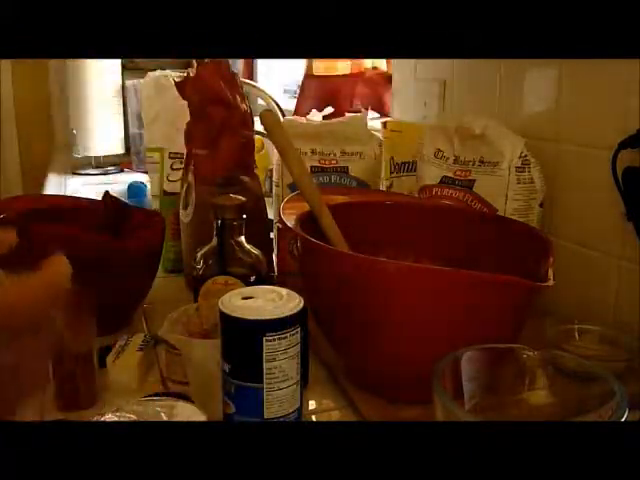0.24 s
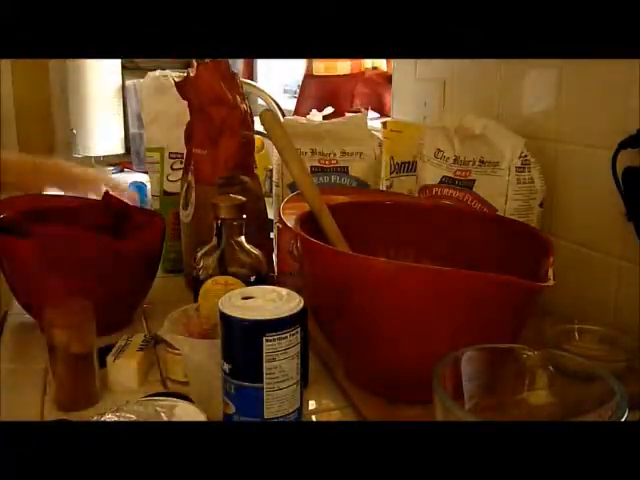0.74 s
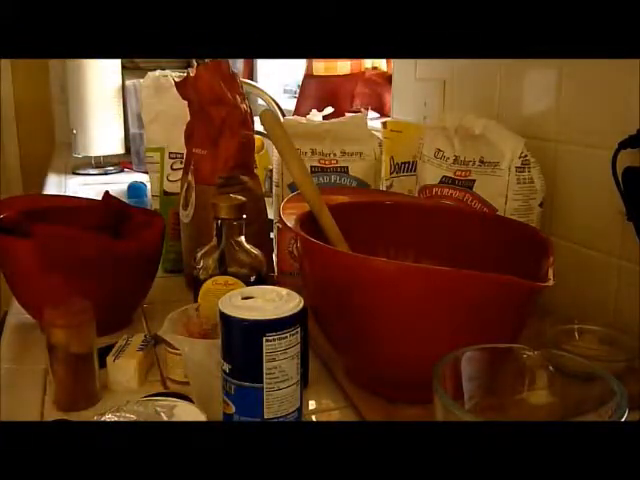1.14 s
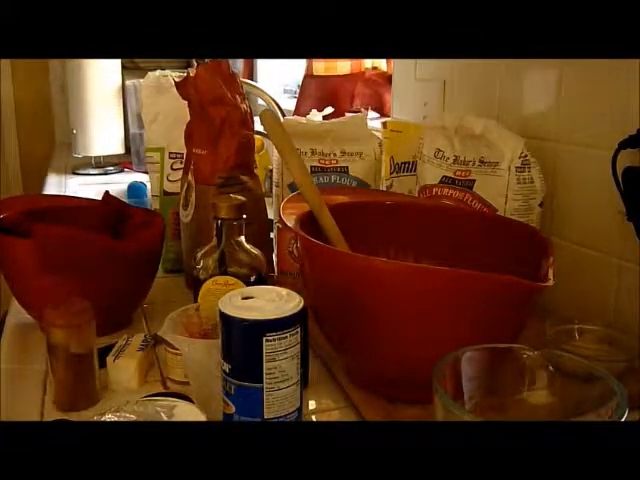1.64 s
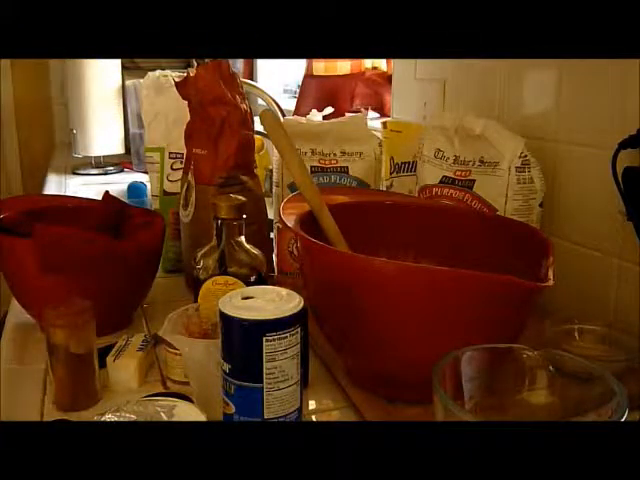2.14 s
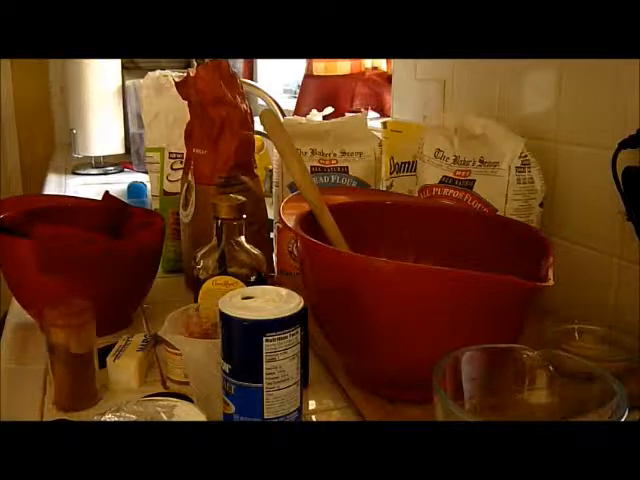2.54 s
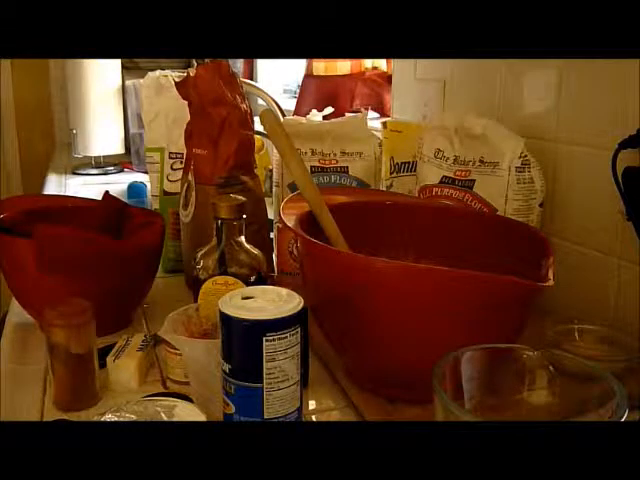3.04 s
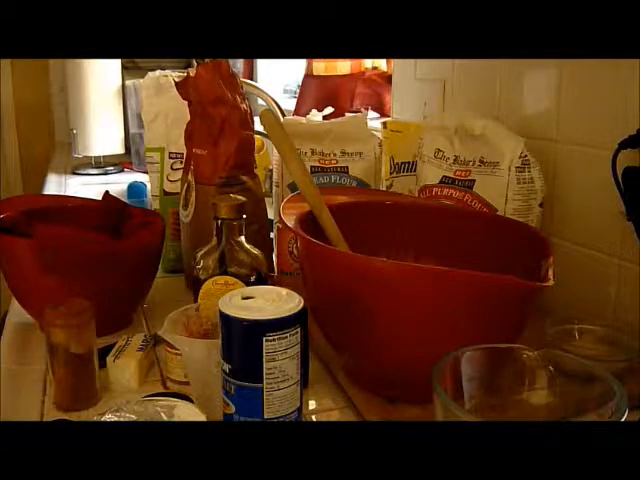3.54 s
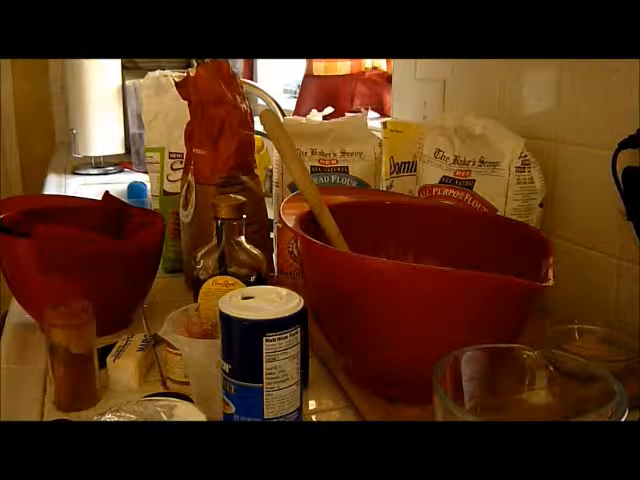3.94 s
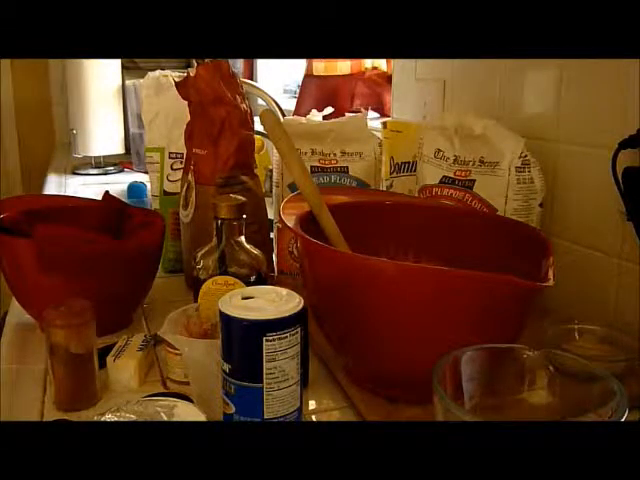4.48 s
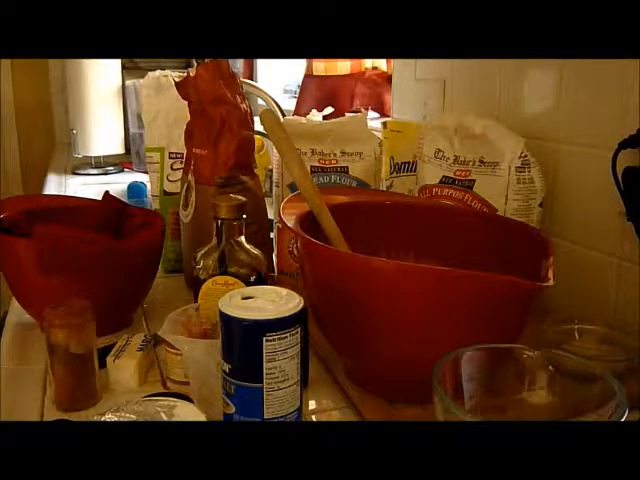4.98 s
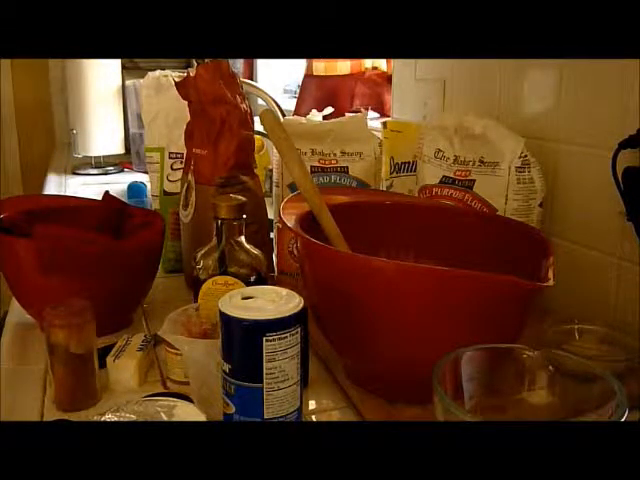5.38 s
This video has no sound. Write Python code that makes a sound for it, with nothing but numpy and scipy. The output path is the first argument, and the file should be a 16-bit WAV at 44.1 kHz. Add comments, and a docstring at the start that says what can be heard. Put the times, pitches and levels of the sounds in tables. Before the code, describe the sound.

A hand faintly brushes a handle, then two crisp metallic clacks release a microwave door. It groans quietly, bumps, and rattles in a quick burst. Glass and bowl rub, ring and tick as the bowl comes out. Near the end, plastic hooks judder and the door bangs shut, booming through the steel cabinet. Lively tiled kitchen, slightly dull mono camera sound, soft rumble and hiss underneath.

```python
"""A microwave oven door in a small tiled kitchen, heard from across the counter.
Its latch snaps open, the door bumps and clatters, then its hooks ride up their ramps and it slams shut.
In between, a bowl is nudged and dragged off the glass tray. Quiet room noise lies underneath.
Knocks are cracks plus grainy noise, ringing parts are fading sine waves,
and rubbing is a stream of uneven pulses sent through resonances."""
import sys
import numpy as np
from scipy import signal
from scipy.fft import rfft, irfft
from scipy.io import wavfile
from scipy.ndimage import uniform_filter1d

SR = 44100
rng = np.random.default_rng(int(sys.argv[2]) if len(sys.argv) > 2 else 0)


def wav_record(signal):
    """Record a signal, one row per channel, as 16-bit PCM in the file named by sys.argv[1]."""
    frames = np.transpose(np.atleast_2d(signal))
    bounded = np.clip(frames, -1, 1)
    # unit amplitude maps onto the largest positive 16-bit level
    quanta = np.round(bounded * 32767).astype(np.int16)
    wavfile.write(sys.argv[1], SR, quanta)


N = 247489  # length of the scene in samples


# The door hits the cabinet, near edge first, then the whole frame: [t/s, level/dB]
SLAM_HITS = [(5.0205, -21), (5.0255, -15)]
# First contact as the door rebounds and shudders: [t/s, level/dB]
SHUDDER = (5.052, -22)
# Colour of the slam: [f/Hz, relative level per Hz/dB]
SLAM_COLOUR = [(35, -28), (58, -17), (105, 1), (200, -3.5), (330, -2), (520, -1), (700, -1.5), (1000, -7.5),
               (1600, -12), (2300, -15), (3200, -21), (5000, -20), (7200, -29.5), (8200, -46)]
# Ringing of the steel cabinet: [f/Hz, relative level/dB, t60/s]
CABINET_MODES = [(103.3, -10.5, 0.41), (184.3, -8.5, 0.55), (224.4, -6, .25), (266.6, -5, 0.24),
                 (307.4, -6.5, 0.34), (333.4, -8.5, 0.3), (401.4, -2.5, 0.38), (443.5, -17, 0.68),
                 (519, -10.5, 0.47), (560, -20, .35), (643, -8, 0.53), (878, -12, 0.45), (895, -15, 0.59),
                 (1065, -16, 0.55), (1297, -23, 0.44), (1695, -17, 0.45)]
# The slam rocks the whole oven: [f/Hz, level/dB, t60/s]
SLAM_THUMP = [(58, -31.5, 0.13), (92.7, -18, 0.082), (243, -17.5, 0.083), (312, -10.5, 0.051),
              (614, -24, 0.038)]


def door_slam():
    """The door strikes the frame and shudders; the blows rock the oven and make its cabinet boom."""
    shudder = rebounds(*SHUDDER, gap_s=0.0225, step_db=-2.5, count=5)
    impacts = SLAM_HITS + shudder
    knock = blows(impacts, SLAM_COLOUR, crack_db=-16.0, rattle_t60=0.073, room_db=-4.5, grain_db=4)
    boom = ringing(impacts, CABINET_MODES, level_db=-5.5)
    return knock + thump(5.0212, SLAM_THUMP) + boom


# The two sprung hooks snap free: [t/s, level/dB, loss per rebound/dB]
LATCH_SNAPS = [(0.6861, -19, 2.26), (0.7685, -19.5, 4.2)]
# Each hook slips just before it snaps, then chatters at the pace of its spring
SLIP_LEAD_S, SLIP_DB, SPRING_GAP_S = 0.0066, -3.5, 0.0087  # slip level is relative to the snap


def latch_contacts():
    """Each hook slips, snaps and chatters, losing the same number of decibels per rebound."""
    hits = []
    for s, db, loss_db in LATCH_SNAPS:
        hits.append((s - SLIP_LEAD_S, db + SLIP_DB))
        hits += rebounds(s, db, SPRING_GAP_S, -loss_db, count=4)
    return hits


# Colour of the opening latch: [f/Hz, relative level per Hz/dB]
LATCH_COLOUR = [(60, -37), (110, -30), (170, -11.5), (260, -17.5), (480, -15.5), (1200, -10.5), (1950, -5),
                (2250, -7.5), (2950, 4), (3600, -5), (4450, -4), (5100, -14), (7300, -17), (8200, -39)]
# Ringing of the latch springs: [f/Hz, relative level/dB, t60/s]
SPRING_MODES = [(174.6, -15.5, 0.38), (209.5, -16.5, 0.32), (322, -13.5, 0.21), (630, -19.5, 0.87),
                (1760, -12, 0.61), (1915, -8.5, 0.51), (2630, -2, .35), (2650, -13, 0.31), (3055, -4, 0.31),
                (3150, -11, 0.21), (3175, -1, 0.28), (3370, -17, 0.22), (3640, -10, 0.31),
                (3920, -10, 0.48), (4290, -11.5, 0.32), (4350, -23, 0.38), (4470, -35, .5)]
# The door jumps free of its frame: [f/Hz, level/dB, t60/s]
RELEASE_THUMP = [(151, -32.5, 0.11), (180, -29.5, 0.1)]


def latch_release():
    """The sprung hooks let go: sharp snaps, ringing springs and a low thump from the freed door."""
    snaps = latch_contacts()
    clicks = blows(snaps, LATCH_COLOUR, crack_db=-9, rattle_t60=0.078, room_db=-3.5, grain_db=3.0)
    springs = ringing(snaps, SPRING_MODES, level_db=-10.5)
    return clicks + springs + thump(0.686, RELEASE_THUMP)


# The two hooks snap home: [t/s, level/dB]
CATCH_HITS = [(5.0203, -20.5), (5.0245, -22)]
# Colour of the closing catch: [f/Hz, relative level per Hz/dB]
CATCH_COLOUR = [(300, 17), (1500, 10), (2800, 13.5), (5000, 6.5), (7500, 0), (8200, -36)]


def latch_catch():
    """Two hooks strike home with a sharp crack and a short, grainy rattle."""
    return blows(CATCH_HITS, CATCH_COLOUR, crack_db=-6.5, rattle_t60=0.083, room_db=-8, grain_db=7.5)


# First contact of the plastic hooks with their ramps: [t/s, level/dB]
HOOK_CONTACT = (4.9695, -28)
# Colour of the hooks: [f/Hz, relative level per Hz/dB]
HOOK_COLOUR = [(25, -38), (60, -7), (170, -6), (260, -11), (550, 4.5), (900, -1), (1700, -0.5), (2400, -6),
               (3500, -7), (7200, -16.5), (8200, -43)]


def hook_judder():
    """Plastic hooks judder up their ramps in a quick run of knocks."""
    judder = rebounds(*HOOK_CONTACT, gap_s=0.0098, step_db=-0.04, count=5)
    return blows(judder, HOOK_COLOUR, crack_db=-21, rattle_t60=0.073, room_db=3.5, grain_db=2.0)


# The moment the door presses hardest against its stop: [t/s, level/dB]
CLATTER_PEAK = (2.4865, -21)
# Time between contacts, then time for the bell to rise and fall by about 9 dB
CLATTER_GAP_S, CLATTER_RISE_S, CLATTER_FALL_S = 0.0135, 0.039, 0.025


def clatter_contacts():
    """The loose door rattles harder as it presses into its stop, then eases off along a bell curve."""
    peak_s, peak_db = CLATTER_PEAK
    start_s = peak_s - 5 * CLATTER_GAP_S
    contacts = rebounds(start_s, peak_db, CLATTER_GAP_S, 0, count=10)
    hits = []
    for s, db in contacts:
        width_s = CLATTER_RISE_S if s < peak_s else CLATTER_FALL_S
        drop_db = 20 / np.log(10) * ((s - peak_s) / width_s) ** 2
        hits.append((s, db - drop_db))
    return hits


# Colour of the clatter: [f/Hz, relative level per Hz/dB]
CLATTER_COLOUR = [(50, -27), (75, -7.5), (110, -4), (165, -0.5), (220, -9), (550, -4), (900, -4.5),
                  (1450, -3), (2100, -11), (2700, -11), (3300, -14.5), (7300, -21), (8200, -44)]
# Ringing of the door: [f/Hz, relative level/dB, t60/s]
DOOR_MODES = [(101, -24, 0.28), (111, -19, 0.32), (535, 2, 0.21), (676, -5, 0.45), (1180, -8, 0.35),
              (1412, -3.5, 0.53), (1460, -1.5, 0.3), (1560, -15, .35), (1760, -8.5, 0.49),
              (2240, -9.5, 0.34), (2830, -13.5, .4)]


def door_clatter():
    """The open door knocks repeatedly against its stop, and each knock makes the door ring."""
    contacts = clatter_contacts()
    rattle = blows(contacts, CLATTER_COLOUR, crack_db=-12.5, rattle_t60=0.11, room_db=-3.0, grain_db=4.0)
    return rattle + ringing(contacts, DOOR_MODES, level_db=-9)


# Soft bumps of the door and cabinet: [t/s, level/dB]
BUMP_HITS = [(2.04, -47), (2.088, -39), (2.103, -41), (2.388, -48.5), (2.775, -46), (2.85, -44)]
# Colour of the bumps: [f/Hz, relative level per Hz/dB]
BUMP_COLOUR = [(45, -10), (100, 1), (240, -0.5), (380, 1), (700, 4), (1100, -11.5), (2500, -16.5),
               (7500, -31)]
# Ringing after the firmest bump: [f/Hz, relative level/dB, t60/s]
BUMP_MODES = [(109, -7, 0.27), (395, -8, 0.23), (563, -5.5, 0.3), (667, -3.5, 0.27), (770, -12, 0.31),
              (4740, -21.5, .3)]


def door_bumps():
    """Soft blows give dull knocks; only the firmest one also rings."""
    firmest = max(BUMP_HITS, key=lambda bump: bump[1])
    bumps = blows(BUMP_HITS, BUMP_COLOUR, crack_db=-18.5, rattle_t60=0.099, room_db=-1.0, grain_db=2.0)
    return bumps + ringing([firmest], BUMP_MODES, level_db=3.0)


# The door panel groans under the hand: [start t/s, rise/s, fall/s, level/dB]
GROANS = [(2.02, 0.012, 0.03, -41), (2.364, 0.006, 0.06, -39)]
# Resonances of the panel: [f/Hz, width/Hz, relative level/dB]
PANEL_MODES = [(98, 24, 2), (185, 23, -4), (327, 44, 3.5), (380, 36, 0.5), (533, 67, -14)]


def panel_groan():
    """The pressed panel sticks and slips slowly, which gives a low groan."""
    return rubbing(GROANS, PANEL_MODES, slip_hz=104.4, jitter=0.13, room_db=-10)


# The door spring rings on after the latch opens: [start t/s, rise/s, fall/s, level/dB]
SPRING_SONGS = [(.8, 0.088, 0.13, -44), (1.0, 0.086, 0.42, -58.5)]
# Resonance of the door spring: [f/Hz, width/Hz, relative level/dB]
SPRING_SONG_MODES = [(657, 17, 0)]


def spring_song():
    """The door spring rings on: nearly regular pulses, close to its pitch, drive one narrow resonance."""
    return rubbing(SPRING_SONGS, SPRING_SONG_MODES, slip_hz=652, jitter=0.044, room_db=-8)


# A hand brushes the handle: [start t/s, rise/s, fall/s, level/dB]
TOUCHES = [(.27, 0.024, .02, -54.5), (.32, 0.0097, 0.027, -46.5)]
# Resonances of the handle: [f/Hz, width/Hz, relative level/dB]
HANDLE_MODES = [(1580, 180, -1.5), (3250, 590, -8.5)]


def handle_touch():
    """The brushing hand excites two broad resonances of the handle."""
    return rubbing(TOUCHES, HANDLE_MODES, slip_hz=808, jitter=0.33, room_db=-2)


# The bowl drags over the tray in one stroke: [start t/s, rise/s, fall/s, level/dB]
DRAGS = [(3.7, 0.04, 0.11, -30.5)]
# Resonances of the rubbed bowl: [f/Hz, width/Hz, relative level/dB]
BOWL_MODES = [(335, 57, -8), (405, 15, -2), (472, 35, -19), (523, 17, -6), (662, 36, -5), (728, 40, -8),
              (1110, 48, 0), (1630, 23, -16), (1862, 40, -8), (2280, 40, -23), (2730, 50, -19),
              (3860, 87, -24.5)]


def bowl_drag():
    """The bowl sticks and slips across the tray, ringing its own resonances."""
    return rubbing(DRAGS, BOWL_MODES, slip_hz=389.7, jitter=0.23, room_db=-9)


# First contact as the bowl rocks while lifting clear: [t/s, level/dB]
LIFT = (3.71, -39.5)
# Ringing of the lifted bowl: [f/Hz, relative level/dB, t60/s]
LIFT_MODES = [(780, 0.5, 0.26), (1088, 0.5, 0.46), (1895, -5, 0.51), (2780, -18.5, 0.29), (3890, -23, 0.47),
              (5180, -28, 0.32)]


def bowl_lift():
    """Three small contacts make the rocking bowl ring."""
    rocks = rebounds(*LIFT, gap_s=0.025, step_db=-0.1, count=3)
    return ringing(rocks, LIFT_MODES, level_db=0.5)


# First light plastic tick as the bowl clears the door: [t/s, level/dB]
TICK = (3.914, -38.5)
# Colour of the tick: [f/Hz, relative level per Hz/dB]
TICK_COLOUR = [(200, -22), (600, -3), (1100, 2), (2400, -8.5), (4200, -5.5), (7200, -12), (8200, -32)]


def bowl_tick():
    """The bowl grazes the door in three light contacts."""
    grazes = rebounds(*TICK, gap_s=0.0074, step_db=-0.5, count=3)
    return blows(grazes, TICK_COLOUR, crack_db=-24, rattle_t60=0.27, room_db=-2.5, grain_db=0.5)


# The glass tray is nudged twice, then rubbed as the bowl starts to drag:
# [start t/s, rise/s, fall/s, level/dB]
TRAY_RUBS = [(3.305, 0.026, 0.043, -37.5), (3.495, 0.032, 0.022, -40), (3.62, 0.073, 0.021, -46)]
# Resonances of the rubbed tray: [f/Hz, width/Hz, relative level/dB]
TRAY_MODES = [(182, 8.8, 1.5), (404, 32, 7.5), (877, 14, -6), (1123, 57, 1), (1244, 44, -2), (1750, 18, -5),
              (2460, 50, -14), (2920, 26, -11.5), (3150, 30, -11.5)]


def tray_rubs():
    """Two nudges and the start of the drag: very uneven slips set the glass tray ringing."""
    return rubbing(TRAY_RUBS, TRAY_MODES, slip_hz=400.4, jitter=.6, room_db=-3.5)


# The rim of the bowl sings briefly: [start t/s, rise/s, fall/s, level/dB]
SQUEAK = [(3.31, 0.013, 0.023, -54)]
# Resonance of the rim: [f/Hz, width/Hz, relative level/dB]
RIM_MODES = [(5680, 30, 0)]


def rim_squeak():
    """A short rub excites one high, narrow resonance of the rim."""
    return rubbing(SQUEAK, RIM_MODES, slip_hz=885, jitter=0.43, room_db=-7)


# Colour of the steady room noise: [f/Hz, relative level per Hz/dB]
ROOM_COLOUR = [(25, -16.5), (50, -12.5), (100, -7), (210, -1.5), (320, 0), (450, -5), (650, -6),
               (1000, -9.5), (1600, -13), (2400, -16), (4000, -19), (7200, -21.5), (8200, -37.5)]
ROOM_DB = -51
# Faint appliance hum: [f/Hz, level/dB]
HUM = [(120, -73), (220, -64), (307, -63.5), (517, -69.5)]


def room_noise():
    """Filtered noise makes soft rumble and hiss; steady sine waves add a trace of hum."""
    t = np.arange(N) / SR
    hum = np.zeros(N)
    for hz, db in HUM:
        hum += from_db(db) * np.sqrt(2) * np.sin(2 * np.pi * (hz * t + rng.random()))
    # the first second is dropped so that the filter has settled
    noise = coloured(rng.standard_normal(N + SR), ROOM_COLOUR)[SR:]
    return from_db(ROOM_DB) * noise + hum


# How long the kitchen reverberates at each pitch: [f/Hz, t60/s]
KITCHEN_T60 = [(100, 0.41), (400, 0.67), (1500, 0.66), (3500, 0.56), (7000, 0.5)]


def kitchen_tail(build_t60=0.0168):
    """One second of diffuse echoes: noise that builds up briefly, then fades at a rate set by its pitch."""
    t, hz = np.arange(SR) / SR, np.fft.rfftfreq(SR, 1 / SR)
    white = rfft(rng.standard_normal(SR))
    centres, t60s = np.transpose(KITCHEN_T60)
    tail = np.zeros(SR)
    # overlapping bands that add up to the full spectrum
    for band, t60 in zip(np.eye(len(centres)), t60s):
        share = at_hz(np.c_[centres, band], hz)
        tail += irfft(white * share, SR) * dying(t, t60)
    return unit(tail * (1 - dying(t, build_t60)))


def blows(hits, colour, crack_db, rattle_t60, room_db, grain_db):
    """Each blow is a crack, a grainy rattle and the room; a hit's dB sets the rattle level over 10 ms."""
    out, t = np.zeros(N), np.arange(SR) / SR
    for s, db in hits:
        # the loudness of the noise jumps every 20 samples
        steps = np.repeat(rng.standard_normal(SR), 20)[:SR].clip(-2, 2)
        grains = rng.standard_normal(SR) * from_db(grain_db * steps)
        blow = unit(grains * dying(t, rattle_t60)) + from_db(room_db) * kitchen_tail()
        blow[0] += from_db(crack_db)
        add(out, s, from_db(db) * np.sqrt(SR / 100) * blow)
    return coloured(out, colour)


def ringing(hits, modes, level_db):
    """Every blow feeds each mode its share of energy, which then dies away."""
    out, t = np.zeros(N), np.arange(SR) / SR
    start = min(s for s, db in hits)
    ring = np.zeros(SR)
    for hz, mode_db, t60 in modes:
        energy = np.zeros(SR)
        for s, db in hits:
            since = t - s + start
            height = from_db(db) * dying(np.maximum(since, 0), t60)
            energy += height ** 2 * (t >= s - start)
        # soften each onset over about 1 ms
        envelope = signal.lfilter([.02], [1, -.98], np.sqrt(energy))
        # reflections make the phase wander a little
        wander = np.cumsum(rng.standard_normal(SR)) * 0.027
        tone = np.sin(2 * np.pi * (hz * t + rng.random()) + wander)
        ring += from_db(mode_db) * envelope * tone
    add(out, start, from_db(level_db) * ring)
    return out


def rubbing(strokes, modes, slip_hz, jitter, room_db):
    """Stick and slip: uneven pulses set resonances ringing under each stroke."""
    t = np.arange(N) / SR
    force = np.zeros(N)
    for s, rise, fall, db in strokes:
        force += from_db(db) * np.interp(t, [s, s + rise, s + rise + fall], [0, 1, 0])
    # jitter is the spread of the logarithm of the gaps
    gaps = np.exp(jitter * rng.standard_normal(N // 20)) / slip_hz
    pulses = np.histogram(np.cumsum(gaps), N, (0, N / SR))[0]
    slips = pulses * (force + 1e-12)
    heard = slips + from_db(room_db) * signal.fftconvolve(slips, kitchen_tail())[:N]
    shares = unit(from_db(np.array(modes)[:, 2]))
    rings = []
    for hz, width, db in modes:
        narrow = resonance(heard, hz, width)
        # smooth contact: next to nothing sounds between the resonances
        rings.append(unit(resonance(narrow, hz, 8 * width)))
    return np.sqrt(np.sum(force ** 2)) * (shares @ np.array(rings))


def thump(s, modes):
    """Heavily damped low modes, all started by one push, with alternating signs."""
    out, t = np.zeros(N), np.arange(SR) / SR
    push = np.zeros(SR)
    for k, (hz, db, t60) in enumerate(modes):
        push += (-1) ** k * from_db(db) * np.sin(2 * np.pi * hz * t) * dying(t, t60)
    add(out, s, push)
    return out


UNEVEN = 0.08  # typical timing error of repeated contacts, as a share of their spacing


def rebounds(s, db, gap_s, step_db, count):
    """A contact repeats at a slightly uneven pace, changing by the same step each time: (t/s, level/dB)."""
    k = np.arange(count)
    late = UNEVEN * rng.standard_normal(count).clip(-2, 2) * (k > 0)
    return list(zip(s + gap_s * (k + late), db + step_db * k))


def coloured(x, spectrum, size=8192):
    """Causal (minimum-phase) filter that gives a noisy sound the stated spectrum and keeps its energy."""
    hz, bins_per_hz = np.fft.rfftfreq(size, 1 / SR), 8
    # present spectrum of the sound, averaged over 50 Hz
    power = uniform_filter1d(np.abs(rfft(x, bins_per_hz * SR)) ** 2, 50 * bins_per_hz)
    present = np.sqrt(power[(hz * bins_per_hz).astype(int)])
    gain = from_db(at_hz(spectrum, hz)) / present
    # folding the cepstrum makes the filter respond as early as possible
    cepstrum = irfft(np.log(gain))
    cepstrum[1:size // 2] *= 2
    cepstrum[size // 2 + 1:] = 0
    response = irfft(np.exp(rfft(cepstrum)))
    filtered = signal.fftconvolve(x, response)[:len(x)]
    return unit(filtered) * np.sqrt(np.sum(x ** 2))


def resonance(x, hz, width):
    """Two-pole band-pass: a part that responds most strongly around one pitch."""
    r = np.exp(-np.pi * width / SR)
    return signal.lfilter([1, 0, -1], [1, -2 * r * np.cos(2 * np.pi * hz / SR), r * r], x)


def dying(t, t60):
    """Exponential decay that falls by 60 dB in t60 seconds."""
    return np.exp(-np.log(1000) * t / t60)


def from_db(db):
    """Decibels to gain."""
    return 10 ** (np.asarray(db) / 20)


def unit(x):
    """Scale to an energy of one."""
    return x / np.sqrt(np.sum(x ** 2) + 1e-20)


def at_hz(points, hz):
    """Read a table along a log-frequency axis."""
    points = np.array(points)
    return np.interp(np.log(np.maximum(hz, 1)), np.log(points[:, 0]), points[:, 1])


def add(out, s, sound):
    """Mix a sound in at a given time in seconds."""
    at = round(s * SR)
    out[at:at + len(sound)] += sound[:N - at]


def scene():
    """All sources add up at one microphone."""
    closing = door_slam() + latch_catch() + hook_judder()
    opening = handle_touch() + latch_release() + spring_song()
    open_door = panel_groan() + door_bumps() + door_clatter()
    bowl = tray_rubs() + rim_squeak() + bowl_drag() + bowl_lift() + bowl_tick()
    return (closing + opening + open_door + bowl + room_noise())[None]


CUTOFF_HZ = 8000
CONVERTER_OFFSET = -.0666  # constant shift; full scale is 1


def record(dry):
    """A small camera: a steep filter cuts the top and the converter sits off centre."""
    low_pass = signal.ellip(12, .1, 90, CUTOFF_HZ, fs=SR, output="sos")
    return signal.sosfilt(low_pass, dry) + CONVERTER_OFFSET


dry = scene()
out = record(dry)
wav_record(out)
```